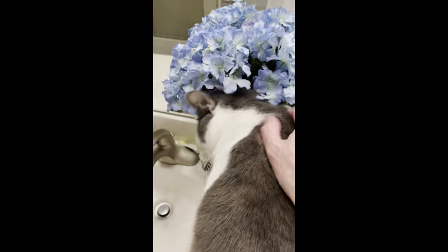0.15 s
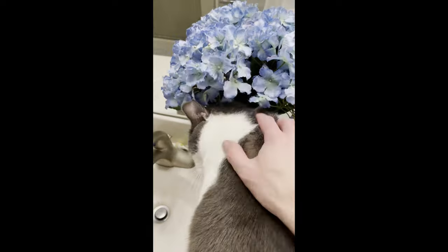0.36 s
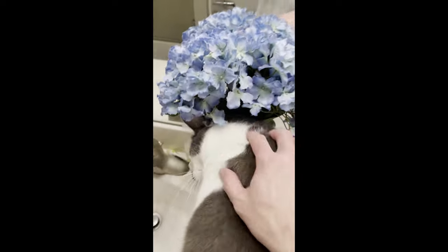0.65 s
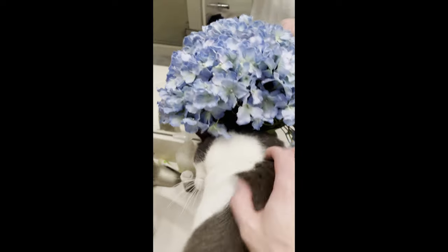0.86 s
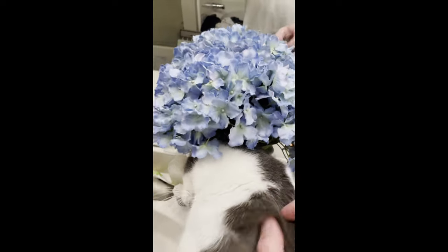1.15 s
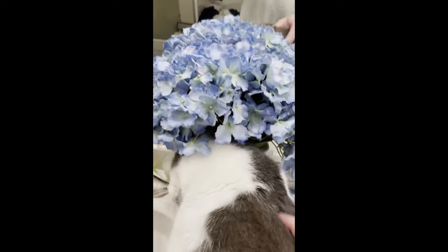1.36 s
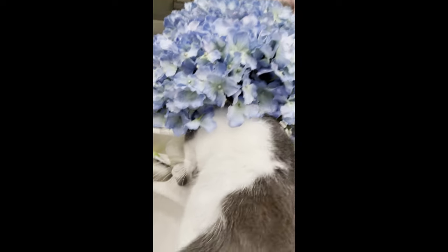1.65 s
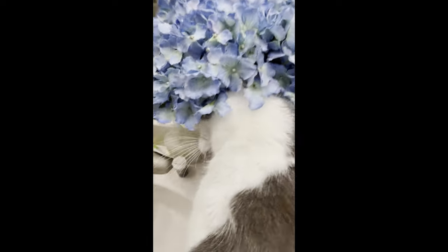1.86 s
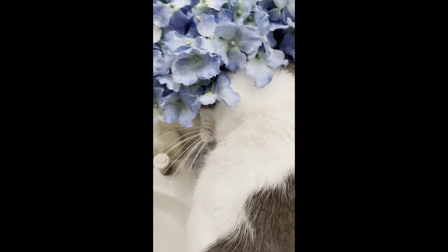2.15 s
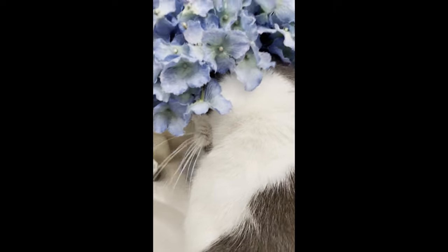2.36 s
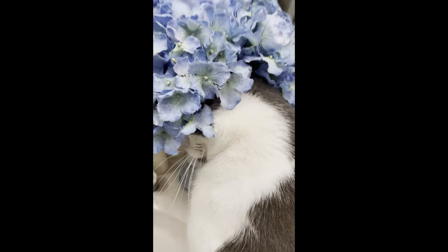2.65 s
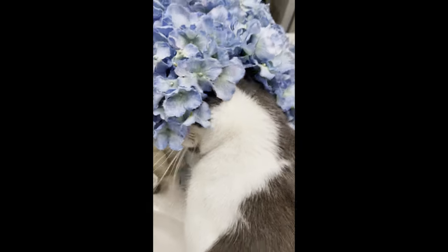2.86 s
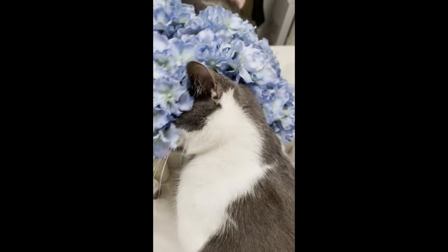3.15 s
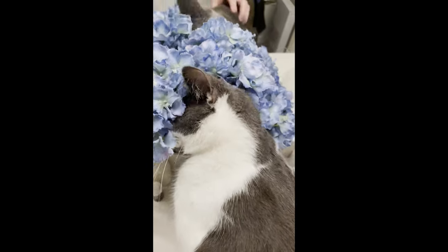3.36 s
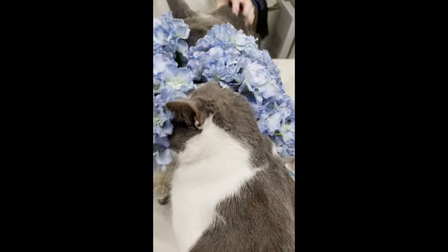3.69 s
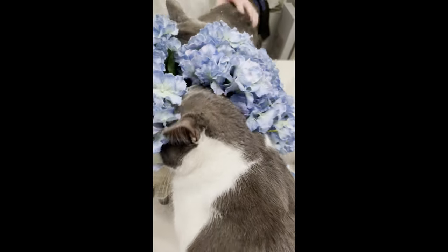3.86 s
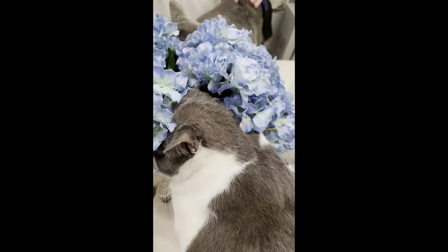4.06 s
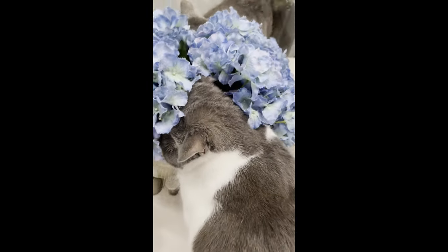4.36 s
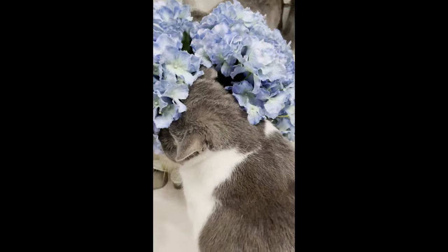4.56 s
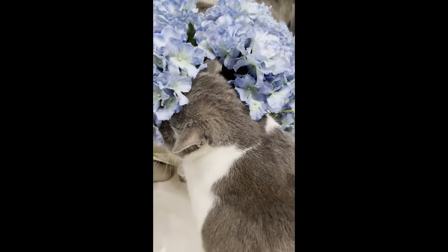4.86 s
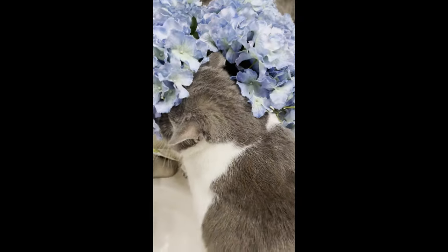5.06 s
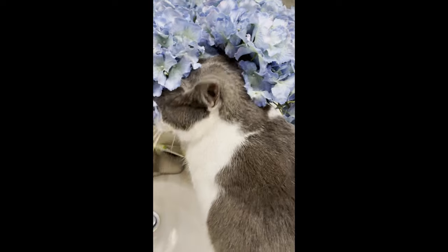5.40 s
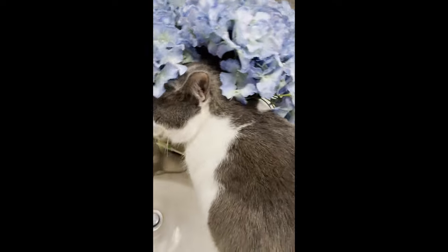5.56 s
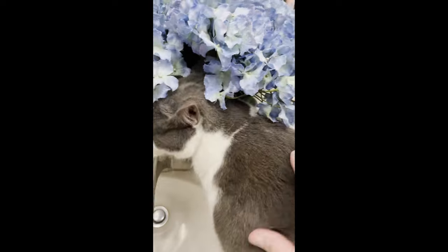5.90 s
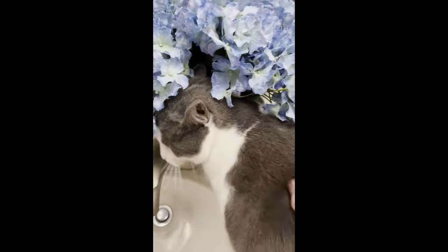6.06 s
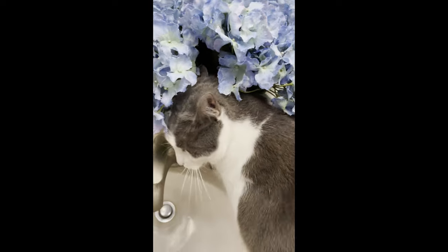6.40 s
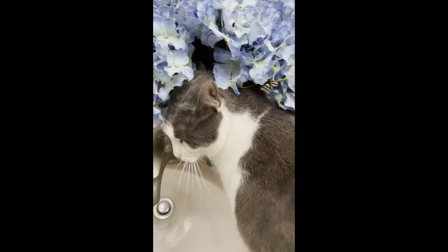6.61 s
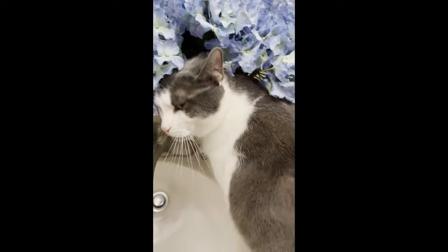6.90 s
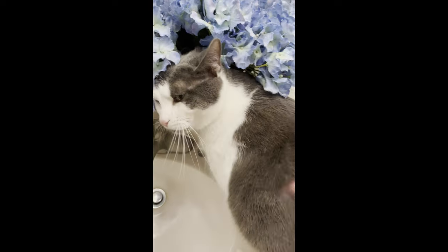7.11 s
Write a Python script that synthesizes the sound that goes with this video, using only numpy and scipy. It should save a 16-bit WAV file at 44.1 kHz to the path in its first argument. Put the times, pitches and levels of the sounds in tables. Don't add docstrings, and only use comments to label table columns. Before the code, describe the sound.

Close up in a small tiled bathroom, fingers scratch a cat's fur in quick soft there-and-back hisses, three or four strokes a second. The cat purrs low and fluttering in uneven bursts and pushes into flowers, whose petals rustle crisply. A vase beside it thuds on the hollow counter, hardest with a glassy clink just before one second and again near five and a half. Tiny ticks and short scrapes dot the scene over faint low hum.

```python
import sys
import numpy as np
from scipy import signal
from scipy.fft import rfft, irfft
from scipy.io import wavfile
from scipy.ndimage import uniform_filter1d

SR = 44100
rng = np.random.default_rng(int(sys.argv[2]) if len(sys.argv) > 2 else 0)


def voltage_ratio(level):
    return 10 ** (np.asarray(level, float) / 20)


def store_pcm(level_fs):
    pcm = np.round(np.clip(level_fs, -1, 1) * 32767).astype(np.int16)
    wavfile.write(sys.argv[1], SR, np.atleast_2d(pcm).T)


N = 319284
TIME_S = np.arange(N) / SR

# start_s, hiss_db, return_after_s, return_hiss_db
SCRATCHES = [(0.0, -61.5, 0.15, -64), (.28, -78, 0.098, -66.5), (.58, -71, 0.17, -65.5),
             (.815, -78, 0.074, -73), (1.071, -62.5, 0.16, -66.5), (1.39, -64.5, 0.18, -69.5),
             (1.725, -59.5, 0.15, -66), (2.07, -59.5, 0.12, -62), (2.389, -61, 0.12, -65),
             (3.02, -70, 0.1, -65), (3.209, -72.5, 0.24, -61), (3.52, -68, 0.089, -65),
             (3.759, -63, 0.087, -65.5), (3.89, -90, 0.14, -64.5), (4.174, -72, 0.15, -62),
             (4.449, -65, .14, -63.5), (4.709, -68, 0.14, -63), (4.978, -67.5, 0.13, -62),
             (5.256, -69, 0.14, -60.5), (5.56, -71.5, 0.2, -62.5), (5.899, -68, .15, -64),
             (6.19, -68, 0.15, -61), (6.458, -63.5, 0.17, -62.5), (6.726, -65.5, 0.18, -65),
             (7.018, -71.5, 0.14, -63.5), (7.235, -67.5, 0.11, -70)]
SCRATCH_TOP_S, SCRATCH_RISE_DB_S, SCRATCH_FALL_DB_S = .01, 185, 250
SCRATCH_BEND = 1.9
# start_s, hold_s, petal_rustle_db, fur_hiss_db
LEANS = [(0.0, 0.067, -63.5, -72), (.12, 0.33, -67, -66.5), (.56, 0.27, -71, -80), (.82, 0.033, -59.5, -66),
         (1.05, 0.048, -68.5, -72), (1.4, 0.13, -71.5, -76), (1.78, 0.5, -69, -73),
         (2.42, 0.14, -68.5, -73), (2.6, 0.28, -70.5, -68.5), (2.92, 0.22, -63.5, -67.5),
         (3.22, 0.096, -70.5, -75), (3.5, 0.46, -67.5, -75), (4.15, 0.063, -68.5, -74),
         (5.17, 0.25, -67.5, -71), (5.46, 0.42, -66.5, -76), (6.03, 0.048, -71.5, -73),
         (6.33, 0.078, -73, -96.5), (6.62, 0.019, -82, -83), (6.85, 0.1, -75, -73)]
LEAN_RISE_DB_S, LEAN_FALL_DB_S = 204.5, 147.5
# start_s, finest_hiss_gain_db
HAND = [
    (0, 0),
    (2.5, 0.5),
    (3.95, 1.5),
    (5.85, -1),
]
SCRATCH_STIRS_DB, REST_DB = -10.5, -91.5
SNAG_DB = 1.3
# freq_hz, density_db_per_hz
FUR_MID = [(180, -29), (300, -14), (439, -26), (510, -9.5), (867, -20), (973, -15), (1270, -7.5),
           (1570, -11.5), (2090, -2.5), (3980, -6.5), (6130, -1.5), (8680, -6), (10100, -10), (13400, -3),
           (15800, -1)]
# freq_hz, density_db_per_hz
FUR_SIDE = [(120, -10), (200, 2.5), (386, -5), (693, -5.5), (787, -2), (863, -7.5), (1610, -19.5),
            (11300, -5), (14100, -12), (15800, -10)]
# freq_hz, density_db_per_hz
PETALS = [(180, 7.5), (300, 5.5), (361, -3), (523, 2), (1300, -0.5), (2430, -1), (4810, -9), (5960, -9.5),
          (9000, -46), (11700, -102), (19800, -120)]

# start_s, hold_s, purr_level_db, second_flap_0_to_1
BREATHS = [(0.0, 0.037, -60, 0.82), (.15, 0.57, -52, 0.5), (.78, 0.24, -52, 0), (1.3, 0.28, -52.5, 0.4),
           (1.85, 0.046, -65.5, 0.95), (2.04, 0.036, -61, 0.5), (2.12, 0.37, -51.5, 0.45),
           (2.58, 0.035, -60, 0), (2.88, 0.24, -61.5, 0.45), (3.07, 0.22, -53, 0), (3.37, 0.11, -57.5, 0.2),
           (3.62, 0.045, -66, 0.34), (3.83, 0.23, -50, 0.1), (4.08, 0.051, -53, 0.94),
           (4.195, 0.02, -56, 0.6), (4.48, 0.015, -64.5, 0.2), (4.6, .04, -63.5, 0.7),
           (4.66, 0.11, -53, 0.9), (4.82, 0.069, -58, .8), (4.9, 0.064, -53, 0.5), (5.25, 0.095, -59, 0.5),
           (5.53, 0.29, -50, 0.2), (5.76, 0.16, -54.5, 0.54), (6.07, 0.025, -60, 0.6),
           (6.24, 0.0087, -61.5, 0.8), (6.4, 0.25, -52.5, 0.6), (6.88, 0.072, -58.5, 0.7),
           (7.09, 0.19, -53, .8)]
BREATH_RISE_DB_S, BREATH_FALL_DB_S = 255, 245.5
# start_s, one_beat_at_s
BEAT_STARTS = [(0, .452), (1.25, 1.612), (1.8, 2.133), (2.5, 2.588), (2.8, 2.923), (3.1, 3.186),
               (3.37, 3.412), (3.6, 3.893), (4.2, 4.213), (4.4, 4.491), (4.64, 4.721), (5.1, 5.265),
               (5.5, 5.722), (6.3, 6.497), (6.8, 6.904), (7.05, 7.127)]
PURR_HZ, CHEST_LAG_S = 26.05, .011
AIR_BARE, AIR_PER_FLAP = .12, .36
# freq_hz, width_hz, level_db
CHEST = [(75.1, 44, 1), (125, 31, 8.5), (169.2, 41.6, 2), (286, 78, -13.5), (350, 65, -20.5)]

# start_s, hold_s, level_db
SHIFTS = [
    (0.0, 0.41, -72.5),
    (.46, 0.48, -68),
    (1.38, 0.084, -67),
    (1.85, 0.55, -80.5),
    (3.0, 0.08, -103),
    (3.9, 0.31, -76.5),
    (5.62, 0.039, -54),
    (5.8, 0.22, -90),
    (6.45, 0.43, -77),
    (6.9, .34, -80),
]
SHIFT_RISE_DB_S, SHIFT_FALL_DB_S, STILL_DB = 132, 95, -86.5
# freq_hz, width_hz
HOLLOW_MODE = (313, 86)
# freq_hz, density_db_per_hz
HUM = [(12, -24), (20, -3), (59, 7), (133, 0), (242, -18.5), (335, -33), (424, -21), (715, -61.5),
       (797, -31.5), (1500, -35), (1950, -89), (3300, -120)]
HUM_DB = -65

# start_s, peak_db, centre_hz, cycles
TICKS = [(0.039, -45, 5200, 1.1), (0.742, -55.5, 2130, 7.4), (.8, -54, 3730, 19), (.803, -47, 1180, 4.7),
         (3.79, -57.5, 2350, 7.5), (3.792, -58, 3600, 14), (5.479, -55, 600, 2.7), (1.459, -45, 12500, 5),
         (1.633, -56.5, 2530, 1.1), (1.358, -56, 900, 1.3), (2.824, -55, 2346, 2.7), (2.37, -60, 1000, 1.5),
         (2.522, -56, 1000, 1.2), (2.297, -50, 600, 2.7), (2.41, -56, 1170, 2.4), (2.445, -65, 1180, 2.5),
         (2.485, -55.5, 880, 1.2), (2.543, -54.5, 565, 1.7), (2.847, -49, 2487, 1),
         (2.845, -42.5, 579, 3.2), (2.989, -54, 2500, 1), (3.255, -44.5, 1150, 0.75),
         (3.255, -49.5, 2370, 3.8), (3.396, -56, 2430, 1.5), (3.44, -65, 762, 5.4), (3.442, -49, 6540, 5.4),
         (4.959, -65, 850, 5), (5.297, -49.5, 2420, 2.1), (5.373, -47, 2604, 1.7), (5.602, -58.5, 2430, 26),
         (5.606, -57, 636, 3.9), (5.896, -52, 2320, 0.97), (6.616, -59, 1130, 3.3)]

# start_s, hold_s, level_db
PUSHES_A = [
    (.125, 0.07, -62.5),
    (.23, 0.11, -68),
    (.32, 0.081, -70),
]
# start_s, hold_s, level_db
PUSHES_A2 = [
    (.14, 0.15, -73),
    (.33, .04, -77),
    (.38, 0.034, -66),
]
# start_s, hold_s, level_db
PUSHES_B = [
    (2.155, 0.08, -72.5),
    (2.49, 0.086, -71),
    (2.62, 0.11, -73),
    (2.8, 0.084, -74),
]
# start_s, hold_s, level_db
PUSHES_C = [
    (3.65, 0.071, -74),
]
# freq_hz, level_db
SING_A = [(1798, -75), (2400, -79), (2686, -72.5), (3240, -65.5), (4447, -80), (5367, -67.5), (5981, -87),
          (7596, -80)]
# freq_hz, level_db
SING_A2 = [(2455, -76), (3330, -69), (5981, -69), (6304, -67), (6874, -65.5), (7596, -73), (13254, -70),
           (13776, -81)]
# freq_hz, level_db
SING_B = [(1717, -78), (2676, -85.5), (3225, -88.5), (4398, -90), (5373, -88), (5949, -88)]
# freq_hz, level_db
SING_C = [(3252, -57), (5114, -93), (6008, -62)]
SLIDE_RISE_DB_S, SLIDE_FALL_DB_S = 297, 346
SLIP_DB = 3.5

# cabinet_db, counter_top_db, clink_db
KNOCKS = [(0.165, -61, 0.5, -3, -16), (0.191, -38, -1.5, -2.5, -31), (0.426, -48.5, -9, -14, -39),
          (0.67, -51, -6, -18.5, -45), (0.81, -31.5, 2.5, -5.5, -3.5), (1.237, -41.5, 0, -14, -34),
          (1.37, -51, -1.5, -21, -21), (1.51, -43, -3.5, -16, -23), (2.228, -38.5, -0.5, -7, -5),
          (2.55, -57.5, -13, -14, -17), (3.104, -50.5, -25, -33, -29), (3.586, -48.5, -9, -20, -39),
          (5.487, -33, 1, -8, -7.5), (5.899, -63.5, -12, -15, -8.5), (6.331, -64, -15, -20, -25),
          (6.442, -48.5, -5.5, -22, -43)]
# freq_hz, level_db, t60_s
BOOM = [(75.3, -19.5, 0.93), (132.2, 3, 0.3), (155.7, 1, 0.24), (183.4, 3, 0.18), (221.6, -4, .25),
        (257, -11, 0.51)]
# freq_hz, level_db, t60_s
WOOD = [(312.5, -8, 0.3), (375.7, -3.5, 0.28), (423, -13, 0.31), (495, -2.5, 0.19), (551, -10.5, 0.25),
        (600, -1, 0.054)]
# freq_hz, level_db, t60_s
TOP = [(687, 5.5, 0.26), (824, -1, 0.16), (865, -18.5, 0.054), (1100, 9.5, 0.037), (1230, -4.5, 0.14),
       (1470, -31, 0.024)]
# freq_hz, level_db, t60_s
GLASS = [(1845, 16.5, 0.055), (1968, 2.5, 0.28), (2220, -5, 0.17), (2353, 11.5, 0.09), (2980, 1, 0.052),
         (3303, -0.5, 0.19), (3600, 8, 0.12), (3860, 6, 0.19), (4100, -5, 0.088), (4726, 4.5, 0.16),
         (5320, -10, 0.135), (5720, -4, 0.25), (6470, -6.5, 0.13), (6980, -5, 0.27)]
# freq_hz, level_db, t60_s
GLASS_HELD = [(1240, -1, 0.061), (1754, 9, 0.033), (1950, 2, 0.084), (2307, 5, 0.06), (2980, -19, 0.087),
              (3450, 0, 0.1), (3690, 5, 0.054), (4630, -9, 0.12), (6030, 0.5, 0.046)]
# freq_hz, level_db, t60_s
GLASS_TURNED = [(1717, 22, 0.068), (1886, 9.5, 0.14), (2300, 9, 0.17), (2870, -12, 0.13),
                (3220, 11.5, 0.082), (3310, 9.5, 0.16), (3680, 5.5, 0.11), (3800, -3, 0.12),
                (4700, -27, 0.12), (5730, -16, 0.089), (6400, -14, 0.033)]
HELD_S, TURNED_S = 2.0, 5.0
DAMPING = 0.57
GLASS_BLUR = .045
GLASS_WET = .3
RATTLE_DB = -10

SPARK_S, SPARK_DB, SPARK_HZ, SPARK_DECAY_S = .81, -54, 13200, .01

# freq_hz, t60_s
ROOM = [(100, 0.46), (300, 0.3), (700, 0.34), (1500, 0.32), (3000, 0.47), (8000, 0.39)]
# freq_hz, side_over_mid_db
ROOM_SIDE = [(60, -32), (125, -19.5), (250, -15), (500, -3), (1000, -2.5), (2000, -9.5), (5000, -6.5)]
# freq_hz, gain_db
PORT_DIP = [(4550, 0), (4780, -7), (5000, 0), (8600, 0), (9250, -11), (10800, -11), (11500, 0)]
PORTS_CANCEL_HZ = 10100


def evened(x):
    return x / np.sqrt(np.mean(x ** 2) + 1e-20)


def read(points, hz):
    f, value = np.transpose(points)
    return np.interp(np.log(hz + 1), np.log(f + 1), value)


def held(rows, order):
    rows = np.array(rows)
    return rows[np.searchsorted(rows[1:, 0], TIME_S + .04), order]


def swells(rows, rise_db_s, fall_db_s, order=2, bend=1):
    power = np.zeros(N // 64 + 2)
    t = np.arange(len(power)) * 64 / SR
    for row in rows:
        start_s, hold_s = row[:2]
        before_db = rise_db_s * np.maximum(start_s - t, 0)
        after_db = fall_db_s * np.maximum(t - start_s - hold_s, 0)
        power += voltage_ratio(row[order] - 10 * ((before_db + after_db) / 10) ** bend) ** 2
    return np.interp(TIME_S, t, np.sqrt(power))


def resonate(x, hz, width_hz):
    return signal.lfilter(*signal.iirpeak(hz, hz / width_hz, SR), x)


def resonate_twice(x, hz, width_hz):
    return resonate(resonate(x, hz, width_hz), hz, width_hz)


def noise(spectrum, patchy_db, side=None, same=.9, size=512):
    hz = np.fft.rfftfreq(size, 1 / SR)[:, None]
    a, b, c, d, patches = rng.standard_normal((4 * N // size + 5, len(hz), 5)).T
    patches = uniform_filter1d(patches, size=8, axis=0)
    patches = evened(uniform_filter1d(patches, size=12, axis=1))
    mid = a + 1j * b
    shared = same * 1j * mid * np.sign(PORTS_CANCEL_HZ - hz)
    across = shared + np.sqrt(1 - same ** 2) * (c + 1j * d)
    z = np.array([mid * voltage_ratio(read(spectrum, hz)), across * voltage_ratio(read(side or spectrum, hz))])
    out = signal.istft(z * voltage_ratio(patchy_db * patches), nperseg=size, noverlap=3 * size // 4)[1][:, :N]
    return np.array([evened(v) for v in out])


def fingers():
    strokes = []
    for start_s, db, after_s, back_db in SCRATCHES:
        for at_s, level_db in ((start_s, db), (start_s + after_s, back_db)):
            strokes.append((at_s - SCRATCH_TOP_S / 2, SCRATCH_TOP_S, level_db - 3))
    return swells(strokes, SCRATCH_RISE_DB_S, SCRATCH_FALL_DB_S, bend=SCRATCH_BEND)


def fur(strokes):
    hiss = noise(FUR_MID, 0.21, FUR_SIDE, same=0.95) * voltage_ratio(np.array([[2.5], [1.5]]))
    high = signal.butter(4, PORTS_CANCEL_HZ, "high", fs=SR, output="sos")
    finest = signal.sosfiltfilt(high, hiss[0])
    hiss[0] += (voltage_ratio(held(HAND, order=1)) - 1) * finest
    snags = signal.oaconvolve(rng.standard_normal(N), np.hanning(1800), "same")
    hiss = hiss * voltage_ratio(SNAG_DB * evened(snags))
    coat = swells(LEANS, LEAN_RISE_DB_S, LEAN_FALL_DB_S, order=3)
    return (np.hypot(strokes, coat) + voltage_ratio(REST_DB)) * hiss


def petals(strokes):
    snaps = voltage_ratio(4.5 * np.minimum(rng.exponential(1, N), 4)) * (rng.random(N) < 500 / SR)
    grain = 0.93 + 0.3 * evened(uniform_filter1d(snaps, size=80))
    rustle = noise(PETALS, 2.97, same=0.27) * voltage_ratio(np.array([[-1.5], [-8.0]]))
    leans = swells(LEANS, LEAN_RISE_DB_S, LEAN_FALL_DB_S)
    return np.hypot(leans, voltage_ratio(SCRATCH_STIRS_DB) * strokes) * grain * rustle


def purr():
    wobble = evened(uniform_filter1d(rng.standard_normal(N), size=2000))
    turns = (TIME_S + CHEST_LAG_S - held(BEAT_STARTS, order=1)) * PURR_HZ
    turns = turns + uniform_filter1d(.02 * wobble, size=2000)
    strength = voltage_ratio(1.5 * rng.standard_normal((400, 2)))
    shut, flap = (np.diff(np.floor(turns - late), prepend=9) == 1 for late in (0, .41))
    second = held(BREATHS, order=3)
    beats = shut * strength[np.cumsum(shut), 0]
    beats = beats + flap * strength[np.cumsum(flap), 1] * second * .75
    drive = evened(beats) + (AIR_BARE + AIR_PER_FLAP * second) * rng.standard_normal(N)
    drive = signal.oaconvolve(drive, np.hanning(150), "same")
    chest = np.zeros(N)
    for k, (hz, width_hz, db) in enumerate(CHEST):
        broad = resonate(drive, hz, 2.4 * width_hz)
        chest += (-1) ** k * voltage_ratio(db) * resonate(broad, hz, width_hz)
    return swells(BREATHS, BREATH_RISE_DB_S, BREATH_FALL_DB_S) * voltage_ratio(-3.5) * evened(chest)


def hollow():
    air = resonate_twice(rng.standard_normal(N), *HOLLOW_MODE)
    stir = np.hypot(swells(SHIFTS, SHIFT_RISE_DB_S, SHIFT_FALL_DB_S), voltage_ratio(STILL_DB))
    return stir * voltage_ratio(-0.5) * evened(air)


def hum():
    return noise(HUM, 3.7, same=0.33, size=2048) * voltage_ratio(HUM_DB + np.array([[0], [-27.0]]))


def ticks():
    out, t = np.zeros(N), np.arange(1500) / SR
    for start_s, db, hz, cycles in TICKS:
        u = 3 * t * hz / cycles
        out[round(start_s * SR):][:len(t)] += voltage_ratio(db) * u * np.exp(1 - u) * np.sin(2 * np.pi * hz * t)
    return out


def slide(pushes, partials, width_hz):
    top_db = max(db for hz, db in partials)
    out = np.zeros((2, N))
    start = max(round((pushes[0][0] - .3) * SR), 0)
    for channel, rub in zip(out, rng.standard_normal((2, 60000))):
        for hz, db in partials:
            channel[start:start + 60000] += voltage_ratio(db - top_db) * evened(resonate(rub, hz, width_hz))
    grip = evened(uniform_filter1d(rng.standard_normal(N // 200 + 1), size=5)).repeat(200)[:N]
    out *= voltage_ratio(SLIP_DB * grip - 1)
    return out * swells(pushes, SLIDE_RISE_DB_S, SLIDE_FALL_DB_S) * voltage_ratio(np.array([[0], [-5.0]]))


def ring(modes, length, blur):
    t, sound = np.arange(SR // 3) / SR, 0
    shakes = rng.standard_normal((len(modes), len(t)))
    for k, ((hz, db, t60_s), shake) in enumerate(zip(modes, shakes)):
        flutter = evened(resonate_twice(shake, hz, blur * hz))
        in_step = np.exp(-np.pi * blur * hz * t)
        wave = (-1) ** k * in_step * np.sin(2 * np.pi * hz * t) + (1 - in_step) * flutter
        rise = np.sin(np.pi / 2 * np.clip(t * hz / 0.45, 0, 1)) ** 2
        sound = sound + voltage_ratio(db - 60 * t / (t60_s * length)) * rise * wave
    return sound * np.clip(30 * (t[-1] - t), 0, 1) / np.std(sound[:900])


def knocks():
    out, t = np.zeros((2, N + SR)), np.arange(4000) / SR
    for start_s, db, wood_db, top_db, clink_db in KNOCKS:
        grit = rng.standard_normal(len(t)) * np.clip(t / 0.00064, 0, 1)
        crack = grit * np.exp(-t / 0.014)
        rattle = grit * np.exp(-t / 0.039) * (1 - t / t[-1])
        wood = ring(BOOM, DAMPING, 0.13)
        wood = wood + voltage_ratio(wood_db) * ring(WOOD, DAMPING, 0.075)
        wood = wood + voltage_ratio(top_db) * ring(TOP, DAMPING, 0.36)
        wood[:len(t)] += voltage_ratio(clink_db + 2) * resonate(resonate(crack, 1600, 6600), 2100, 7400)
        wood[:len(t)] += voltage_ratio(clink_db + RATTLE_DB) * resonate(resonate(rattle, 3400, 3400), 3400, 3350)
        modes = GLASS if start_s < HELD_S else GLASS_HELD if start_s < TURNED_S else GLASS_TURNED
        glass = voltage_ratio(clink_db - 0.5) * ring(modes, 0.89, GLASS_BLUR)
        start = round(start_s * SR)
        out[:, start:start + len(wood)] += voltage_ratio(db - 1) * np.array([wood, glass])
    return out[:, :N]


def spark():
    away_s = TIME_S - SPARK_S
    spray = resonate(rng.standard_normal(N), SPARK_HZ, 3000)
    return voltage_ratio(SPARK_DB) * (away_s > 0) * np.exp(-abs(away_s) / SPARK_DECAY_S) * evened(spray)


def room(x):
    hz, t, z = signal.stft(rng.standard_normal((2, SR)), SR, nperseg=512)
    z = z * voltage_ratio(-60 * t / read(ROOM, hz)[:, None])
    z[1] *= voltage_ratio(read(ROOM_SIDE, hz) + 2.5)[:, None]
    tail = signal.istft(z, SR, nperseg=512)[1]
    tail[:, :90] = 0
    return signal.fftconvolve(x[None], tail / np.linalg.norm(tail[0]), axes=1)[:, :N]


def scene():
    strokes, cat = fingers(), purr()
    wood, glass = knocks()
    hits = wood + glass + ticks()
    blows = voltage_ratio(-6.0) * room(hits - (1 - GLASS_WET) * glass + .5 * cat)
    blows[0] = np.convolve(blows[0] + hits, [.47, .12, .47], "same")
    blows[1] += np.gradient(hits)
    blows[1] -= voltage_ratio(-7.5) * resonate_twice(hits, 560, 450)
    both = fur(strokes) + petals(strokes) + hum() + blows
    both += slide(PUSHES_A, SING_A, 27) + slide(PUSHES_A2, SING_A2, 30)
    both += slide(PUSHES_B, SING_B, 16) + slide(PUSHES_C, SING_C, 41)
    both[0] += cat + hollow() + spark()
    both[1] += 0.036 * cat
    return np.array([both[0] + both[1], both[0] - both[1]])


def top_cut(x):
    return signal.sosfilt(signal.butter(12, 15770, fs=SR, output="sos"), x)


def record(dry):
    mid, side = (dry[0] + dry[1]) / 2, (dry[0] - dry[1]) / 2
    mid = irfft(rfft(mid) * voltage_ratio(read(PORT_DIP, np.fft.rfftfreq(N, 1 / SR))), N)
    mid, side = signal.oaconvolve([mid, side], signal.firwin(511, 15760, fs=SR)[None], "same")
    bass_cut = signal.butter(3, 42, "high", fs=SR, output="sos")
    mix = signal.sosfilt(bass_cut, [mid + side, mid - side])
    return top_cut(mix)


dry = scene()
out = record(dry)
store_pcm(out)
```